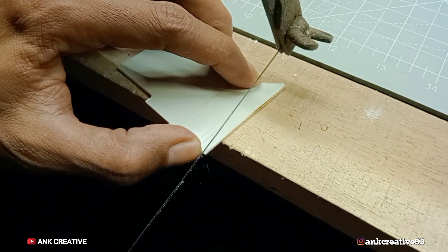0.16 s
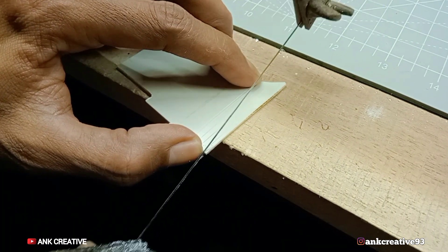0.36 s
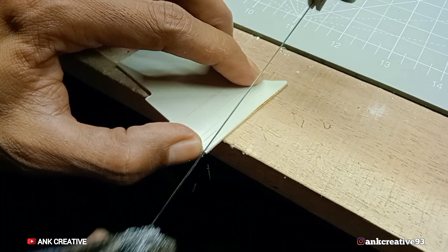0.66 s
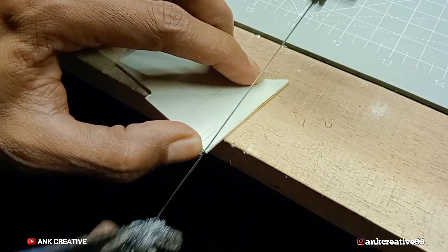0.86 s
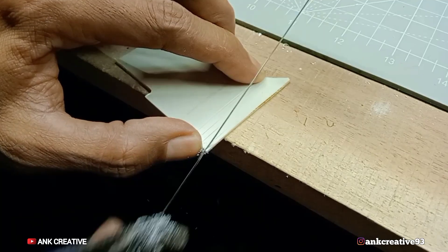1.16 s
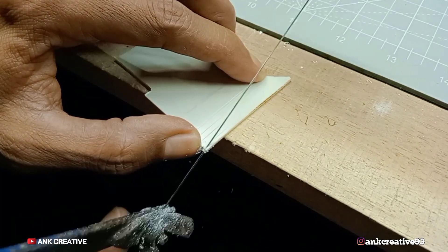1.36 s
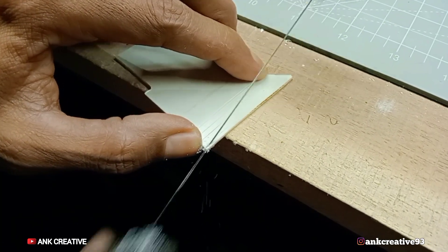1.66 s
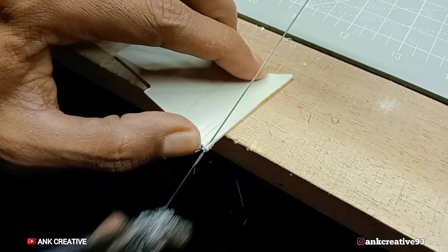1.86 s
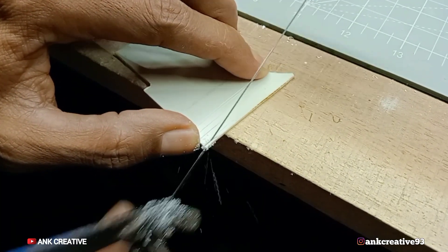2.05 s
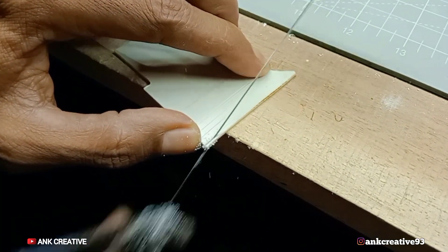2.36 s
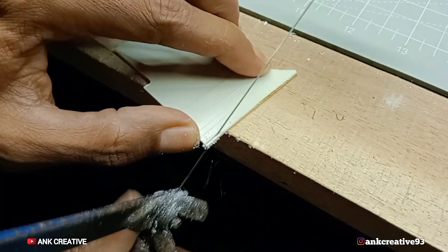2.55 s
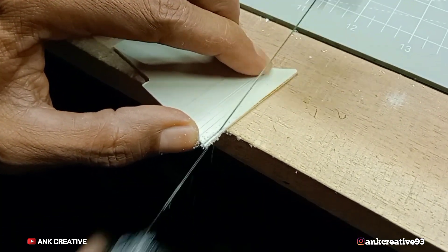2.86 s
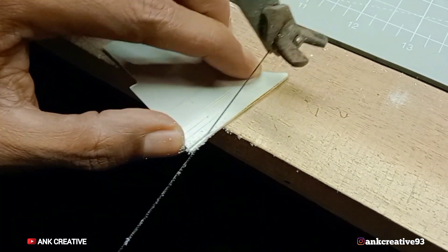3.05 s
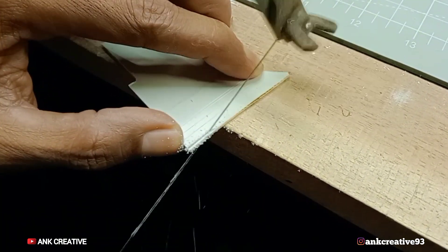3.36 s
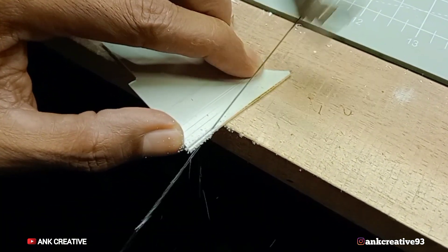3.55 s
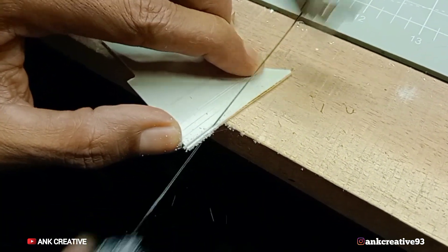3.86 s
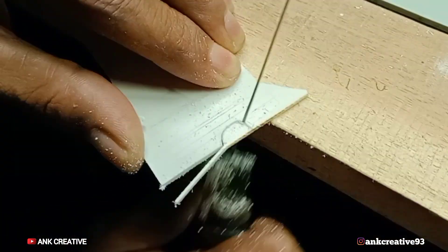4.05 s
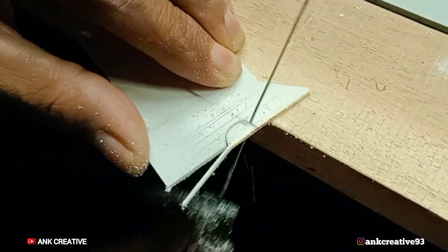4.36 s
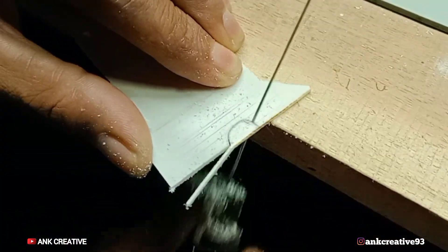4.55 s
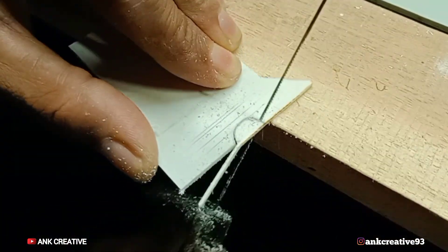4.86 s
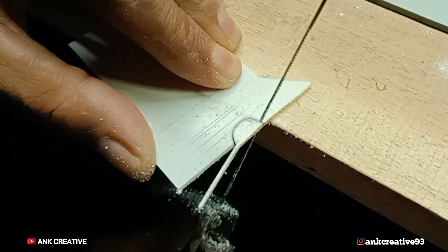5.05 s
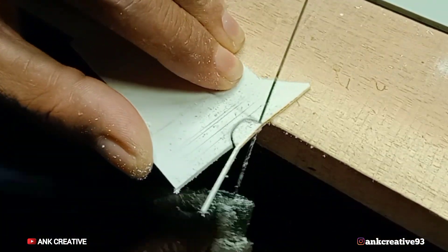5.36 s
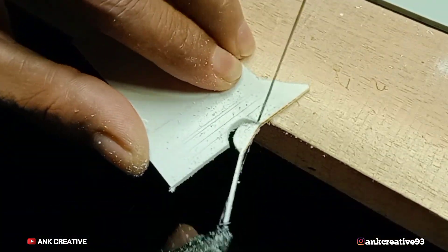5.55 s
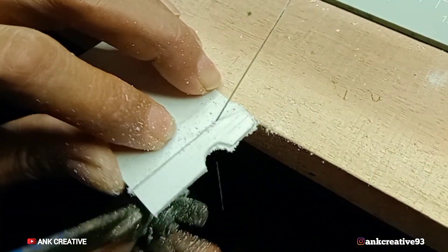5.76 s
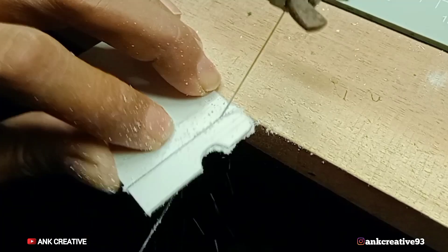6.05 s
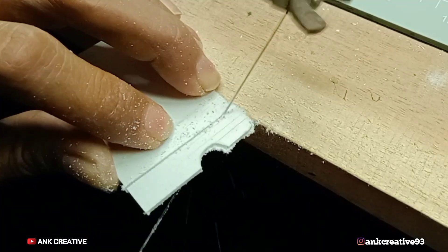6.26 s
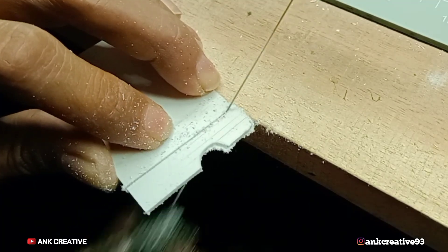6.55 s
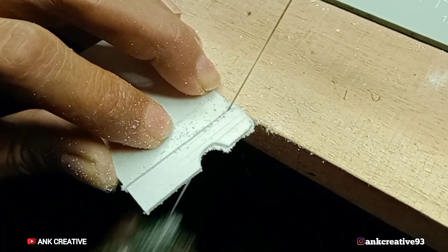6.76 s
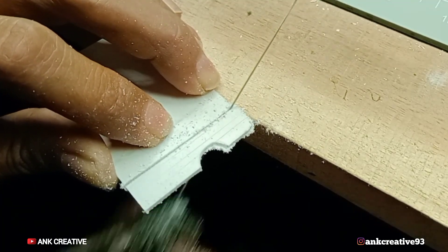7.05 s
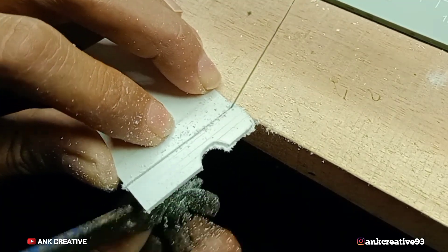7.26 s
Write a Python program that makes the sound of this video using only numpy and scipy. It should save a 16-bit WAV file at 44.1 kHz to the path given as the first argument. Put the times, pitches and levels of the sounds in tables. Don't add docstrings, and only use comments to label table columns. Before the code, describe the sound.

A fretsaw cuts thin plastic in quick rasping back-and-forth strokes on a wooden bench, with small snaps, low thumps and faint crickets behind.

```python
import sys
import numpy as np
from scipy import signal
from scipy.fft import rfft, irfft
from scipy.io import wavfile
from scipy.ndimage import uniform_filter1d, map_coordinates

SR = 44100
rng = np.random.default_rng(int(sys.argv[2]) if len(sys.argv) > 2 else 0)


def file_out(sig):
    cols = np.atleast_2d(sig).T
    lim = np.clip(cols, -1, 1)
    pcm = np.round(lim * 32767).astype(np.int16)
    wavfile.write(sys.argv[1], SR, pcm)


def makeup_ratio(level_db):
    decades = np.asarray(level_db, float) / 20
    return 10 ** decades


N = 326340
TIME_S = np.arange(N) / SR
CATCH_HISS_DB = -34

REGRIP_S = [
    4.205,
    5.59,
]
# start_s, length_s, rasp_db, bench_weight_db (over rasp)
CUTS = [(0.391, 0.098, -47, 17), (0.661, 0.097, -42.5, 17), (0.903, 0.11, -44, 18),
        (1.155, 0.11, -41.5, 14.5), (1.402, 0.097, -38, 11.5), (1.639, 0.1, -36.5, 10),
        (1.881, 0.081, -34.5, 11), (2.106, 0.098, -35.5, 13.5), (2.36, 0.092, -33.5, 11.5),
        (2.59, 0.095, -32.5, 10.5), (2.831, 0.099, -34, 10.5), (3.244, .1, -34, 10), (3.496, 0.087, -32, 7),
        (3.739, 0.082, -31, 9.5), (3.965, 0.1, -33.5, 11), (4.32, 0.091, -30.5, 14.5),
        (4.557, 0.083, -33, 17), (4.785, 0.081, -26, 12.5), (4.988, 0.077, -33.5, 17),
        (5.194, 0.094, -32, 13), (5.468, 0.069, -40.5, 11), (5.792, 0.075, -31.5, 5.5),
        (5.991, 0.084, -30, 8.5), (6.205, 0.077, -28.5, 3.5), (6.425, 0.076, -29, 5),
        (6.637, 0.07, -29.5, 3), (6.861, 0.063, -31.5, 3), (7.064, 0.092, -37, 3)]
# start_s, length_s, rasp_db, bench_weight_db (over rasp)
RETURNS = [(0.23, 0.099, -51.5, 12.5), (0.515, 0.11, -47, 10), (0.786, 0.097, -43.5, 10),
           (1.042, 0.092, -40.5, 4.5), (1.279, 0.1, -44.5, 10.5), (1.509, 0.11, -44, 6),
           (1.747, .11, -41, 4), (1.982, .11, -41.5, 2.5), (2.228, 0.099, -42.5, 7.5), (2.468, 0.1, -41, 8),
           (2.708, 0.098, -39.5, 5), (3.118, 0.108, -44, -7), (3.366, 0.1, -40.5, 8), (3.598, .11, -42, 10),
           (3.84, 0.1, -40.5, 2), (4.084, 0.098, -46, 5), (4.454, 0.078, -45.5, 25),
           (4.689, 0.053, -46.5, 27), (4.892, 0.077, -44, 24), (5.118, 0.057, -38, 14.5),
           (5.312, 0.073, -49.5, 5), (5.888, 0.078, -42.5, 10), (6.097, 0.085, -45, 9),
           (6.314, 0.08, -41, 10), (6.528, 0.076, -42, 11), (6.745, 0.087, -44.5, 10),
           (6.963, 0.085, -50.5, 14.5), (7.186, 0.091, -48, -4)]
# centre_hz, width_hz, level_db
SHEET = [
    [(967, 80, 0), (1404, 98, -2), (1920, 226, -6.5), (2200, 75, -3), (2740, 140, 1.5), (3022, 153, 0),
     (3460, 83, -4.5), (4217, 146, -3.5), (4520, 150, -11)],
    [(953, 163, 4.5), (1348, 71, -5), (1830, 720, -4), (2750, 77, -2), (3066, 91, 0.5), (3920, 43, -25),
     (4206, 46, -26), (4300, 43, -6.5)],
    [(938, 133, 1.5), (1404, 76, -5), (1892, 250, -4), (2200, 240, 1), (2490, 70, -21), (2706, 78, 2),
     (3340, 470, -6.5), (3500, 160, -8), (4330, 430, -14)],
]
# centre_hz, width_hz, level_db
BENCH = [
    [(94, 25, -11), (158, 25, -1.5), (300, 20, -4), (500, 112, -6), (678, 56, -12)],
    [(155, 47, 0.5), (224, 14, 2), (283, 49, -3), (472, 157, -4), (694, 33, -14)],
    [(121, 24, -1), (187, 11, -19), (300, 41, -3), (520, 130, -9), (677, 150, -11)],
]
# centre_hz, width_hz, level_db
BLADE = [
    [(7300, 130, -2), (9370, 1100, -5), (10730, 660, -21)],
    [(7370, 270, 6.5), (8200, 840, 3.5), (9800, 510, 11)],
    [(6900, 990, -3.5), (9160, 1100, 2), (10200, 500, -2)],
]
# freq_hz, level_db
SCRAPE = [(25, -74), (700, -13), (1200, -2), (1600, -28.5), (2500, -5.5), (3800, -10), (4800, -22.5),
          (5500, -46), (16000, -106)]
# freq_hz, level_db
BOOM = [(20, -84), (70, -23.5), (120, -4.5), (300, -5), (650, -19), (800, -25.5), (1500, -45),
        (16000, -100)]
# freq_hz, level_db
FIZZ = [(2000, -61), (5000, -6), (6200, -14.5), (7500, -10.5), (10000, -13), (11500, -16.5), (13000, -15),
        (15600, -55)]


def unit(x):
    return x / np.sqrt(np.mean(x ** 2) + 1e-20)


def along(points, hz):
    f, v = np.transpose(points)
    return np.interp(np.log(hz + 1), np.log(f + 1), v)


def wobble(rate):
    return map_coordinates(rng.standard_normal(int(N * rate / SR) + 4), [np.arange(N) * rate / SR])


def grip_at(s):
    return np.searchsorted(REGRIP_S, s)


def body(x, modes, between):
    size = 8192
    hz = np.fft.rfftfreq(size, 1 / SR)
    power = makeup_ratio(2 * along(between, hz))
    for centre_hz, width_hz, db in modes:
        power = power + makeup_ratio(2 * db) / (1 + ((hz - centre_hz) / (0.59 * width_hz)) ** 2) ** 2
    cepstrum = irfft(np.log(power) / 2)
    cepstrum[1:size // 2] *= 2
    cepstrum[size // 2 + 1:] = 0
    response = irfft(np.exp(rfft(cepstrum)))
    return signal.fftconvolve(x, response / np.linalg.norm(response))[:N]


def gripped(x, bodies, between):
    edges = [0, *(round(s * SR) for s in REGRIP_S), N]
    out = np.zeros(N)
    for start, end, modes in zip(edges, edges[1:], bodies):
        answer = body(x[start:end], modes, between)[:N - start]
        out[start:start + len(answer)] += answer
    return out


def saw():
    # centre_hz, width_hz, level_db
    board_modes = [
        (516, 510, -48),
        (500, 130, -54),
        (520, 136, -38.5),
    ]
    # freq_hz, level_db
    kerf = [(600, -29.5), (1300, 4.5), (3000, 2.5), (4700, -18), (5400, -22), (9000, -49)]

    rasp, bench, hiss = strokes(bite=0.013, edge_db=7.0)
    force = unit(tooth_beat(rasp) * teeth(rate=2500, spread_db=2.5, rub=1.0, clump_db=3.5))
    fine = 0.55 * force + teeth(rate=3800, spread_db=3.5, rub=1.36, clump_db=1.5)
    push = 0.5 * force + teeth(rate=400, spread_db=0.5, rub=1.0, clump_db=1)

    sheet = gripped(makeup_ratio(3.5) * rasp * roaming(force, depth_db=1.0), SHEET, SCRAPE)
    sheet += makeup_ratio(-5.5) * rasp * squeaks(rate=260, cycles=6.3, spread_db=12.0)
    flanks = body(makeup_ratio(-48.0) * unit(rasp) ** 0.74 * fine, [], kerf)
    boom = gripped(makeup_ratio(-6.0) * bench * roaming(push, depth_db=0.0), BENCH, BOOM)

    board_gain = makeup_ratio(np.array(board_modes)[grip_at(TIME_S), 2])
    drone = uniform_filter1d(unit(rasp) ** 0.38, 900) * board_gain
    single_modes = [[(hz, width_hz, 0)] for hz, width_hz, _ in board_modes]
    board = gripped(drone * push, single_modes, [(300, -5.0), (1500, -42), (5000, -86)])

    cut_edges_s = [e for s, length, *_ in CUTS for e in (s - .01, s + length + .01)]
    cutting = np.searchsorted(cut_edges_s, TIME_S) % 2
    treble = blade(hiss, fine, cutting) + chips(hiss, cutting)
    return sheet + flanks + boom + board + overtones(treble, depth_db=3.0) + table(bench)


def strokes(bite, edge_db):
    # start_s, length_s, rasp_db, bench_weight_db (over rasp)
    feelers = [
        (0.062, 0.021, -64, 24.5),
        (0.1, 0.062, -60.5, 16),
        (4.222, 0.093, -34.5, 10),
        (5.624, 0.052, -45.5, 5),
        (5.718, 0.026, -38, -12),
        (7.291, 0.081, -48.5, -11),
    ]
    peak_place = [
        [0.61, 0.67, 0.56],
        [0.72, 0.24, 0.81],
        [.3, .85, 0.43],
    ]
    hiss_level_db = [
        [-20, -19.5, -20],
        [-23, -22.5, -21.5],
        [-28, -29, -20],
    ]
    pointed_db = [
        [6.4, 8.5, 12],
        [5.7, 6.9, 10.8],
        [12, 18, 6.5],
    ]
    dig_in = [
        [14, 12, 6],
        [16, 40, 11],
        [30, 6, 30],
    ]
    creep_in_db = [-14.5, -17.5, -23]
    shivers_db = [
        np.zeros(len(CUTS)),
        [-1, -0.5, 0.5, 1, 3, 3, 3, 1.5, 1, -0.5, -1.5, 2.5, -1.5, 0, 1.5, -1, -5, 3.5, -2, -9, 5.5, 4, 1, -2.5, -6, -4, 1, -4],
        [0, 0, -0.064, -0.57, -1.3, 1.1],
    ]
    hiss_lag = 0.22
    let_go = 9

    power = np.zeros((3, N))
    for kind, rows in enumerate([CUTS, RETURNS, feelers]):
        for (start, length, rasp_db, bench_db), shiver_db in zip(rows, shivers_db[kind]):
            grip = grip_at(start)
            near = slice(max(round((start - .06) * SR), 0), round((start + length + 0.12) * SR))
            peak = np.clip(peak_place[kind][grip], .12, .88)
            hiss_db = hiss_level_db[kind][grip] + shiver_db - hiss_lag * (rasp_db + 35.5)
            u = (TIME_S[near] - start) / length - peak
            steep = np.where(u < 0, dig_in[kind][grip], let_go)
            u = np.where(u < 0, -u / peak, u / (1 - peak))
            arch_db = max(pointed_db[kind][grip] + bite * (rasp_db + 36.0), 1)
            shape_db = -arch_db * np.array([[1], [.9], [.5]]) * u ** 0.98 - edge_db * u ** steep
            creep_db = np.where(steep == let_go, -12, creep_in_db[grip]) - 11 * u
            shape_db = np.maximum(shape_db, creep_db)
            power[:, near] += makeup_ratio(2 * (rasp_db + np.array([[0], [bench_db], [hiss_db]]) + shape_db))
    return np.sqrt(power)


def teeth(rate, spread_db, rub, clump_db):
    size = np.minimum(rng.exponential(size=N), 3.5)
    slips = (rng.random(N) < rate / SR) * makeup_ratio(spread_db * size) * rng.choice([-1, 1], N)
    rubbed = unit(slips) + rub * rng.standard_normal(N)
    return unit(rubbed * makeup_ratio(clump_db * wobble(140)))


def tooth_beat(rasp):
    tooth_hz, sway = 190, .25
    full_depth, full_bite_db = .7, -35
    turn = np.cumsum(tooth_hz * np.exp(sway * wobble(45)) / SR)
    size = rng.uniform(0.36, 1.51, int(turn[-1]) + 1)[turn.astype(int)]
    depth = full_depth * np.clip(rasp / makeup_ratio(full_bite_db), 0, 1) ** .7
    kicks = uniform_filter1d(size * np.exp(-3 * (turn % 1)), size=24)
    return 1 - depth + depth * 2.46 * kicks


def roaming(x, depth_db):
    z = signal.stft(x, nperseg=256)[2]
    field = uniform_filter1d(rng.standard_normal(z.shape), size=4, axis=0)
    field = uniform_filter1d(field, size=14, axis=1)
    return signal.istft(z * makeup_ratio(depth_db * unit(field)), nperseg=256)[1][:N]


def squeaks(rate, cycles, spread_db):
    count, span = int(rate * N / SR), np.arange(700)
    at, pick, size, detune = rng.random((count, 4)).T
    grips = grip_at(at * N / SR)
    mode_hz = [SHEET[g][1 + int(p * (len(SHEET[g]) - 1))][0] for g, p in zip(grips, pick)]
    hz = np.array(mode_hz) * (.96 + 0.091 * detune)
    turns = hz[:, None] * span / SR
    swell = turns / cycles * np.exp(-turns / cycles) * makeup_ratio(spread_db * size)[:, None]
    where = (at * N).astype(int)[:, None] + span
    tones = swell * np.sin(2 * np.pi * turns)
    return unit(np.bincount(where.ravel(), tones.ravel(), N + 700)[:N])


def blade(hiss, fine, cutting):
    # centre_hz, width_hz, level_db
    blade_back = [
        [(8060, 400, -5), (9600, 390, -0.5), (10200, 500, -18)],
        [(7420, 400, 0), (9340, 550, 9), (10000, 560, 2)],
        [(7200, 500, -11), (8900, 980, 0.5), (10060, 930, -3)],
    ]
    shiver = makeup_ratio(1.5) * hiss * roaming(fine, depth_db=3.0)
    return gripped(shiver * cutting, BLADE, FIZZ) + gripped(shiver * (1 - cutting), blade_back, FIZZ)


def chips(hiss, cutting):
    # centre_hz, width_hz, level_db
    rattle = [
        [(14600, 900, 1), (10650, 1500, 5.5), (12900, 700, -2)],
        [(14600, 1500, -8), (11700, 540, 2)],
        [(13000, 2000, 4), (14900, 900, -4)],
    ]
    # freq_hz, level_db
    dust = [(9000, -40), (11800, -6), (13800, -7), (15300, -3.5)]
    start_db = [4, -17, -10]
    slope_db_per_s = [-1.85, 6, 6]
    cut_db = -0.5
    grip = grip_at(TIME_S)
    held_s = TIME_S - np.array([0, *REGRIP_S])[grip]
    level_db = np.take(start_db, grip) + np.take(slope_db_per_s, grip) * held_s + cut_db * cutting
    spray = roaming(teeth(rate=1500, spread_db=5, rub=0.92, clump_db=0.5), depth_db=1.5)
    return gripped(makeup_ratio(level_db) * hiss * unit(hiss) ** 0.24 * spray, rattle, dust)


def overtones(x, depth_db):
    z = signal.stft(x, nperseg=512)[2]
    field = uniform_filter1d(rng.standard_normal(z.shape), size=16, axis=1)
    gain_db = depth_db * unit(field) - .115 * depth_db ** 2
    return signal.istft(z * makeup_ratio(gain_db), nperseg=512)[1][:N]


def catches():
    # time_s, peak_db, ring_hz, hiss_db (over peak)
    hard_catches = [(.724, -25, 2200, -34), (1.2084, -21.5, 2930, -23), (1.231, -21, 2870, -28),
                    (1.4677, -25.5, 3490, -16.5), (1.6835, -19, 3260, -25), (1.935, -19, 3610, -22),
                    (2.1726, -21.5, 3650, -21.5), (2.4006, -22, 3170, -48), (2.639, -16.5, 4270, -27),
                    (2.663, -21, 2720, -38), (2.8869, -15.5, 3360, -24), (3.3024, -22.5, 4210, -21),
                    (3.3306, -20, 1970, -38), (3.558, -19, 3210, -25), (3.7686, -18.5, 3330, -24),
                    (4.0097, -19, 3530, -21), (4.0266, -15.5, 3340, -24), (4.329, -21.5, 1900, -17),
                    (4.5908, -20, 1820, -21), (4.604, -15.5, 1830, -34), (4.7884, -19.5, 1820, -43),
                    (4.834, -9.5, 1820, -38), (5.02, -26.5, 1800, -28), (5.0403, -18.5, 1810, -48),
                    (5.8168, -17, 2740, -19.5), (6.0354, -19, 3860, -17.5), (6.2499, -11, 3310, -23),
                    (6.448, -18.5, 3480, -21.5), (6.6766, -18.5, 2200, -20), (6.9025, -20, 2200, -45)]
    # time_s, peak_db, ring_hz
    snags = [(2.5465, -20, 1920), (3.152, -29, 2720), (3.169, -29, 3030), (3.438, -20, 2720),
             (3.9129, -23, 3200), (3.9705, -22, 1780), (4.148, -23.5, 2050), (4.458, -35, 2630),
             (4.476, -28, 2120), (4.2889, -18, 2190), (4.4883, -19.5, 2190), (4.6927, -32, 930),
             (4.983, -33, 1830), (3.9053, -25, 2750), (4.913, -19, 2920), (4.9502, -19, 1840),
             (5.117, -27, 2710), (5.274, -21, 1830), (5.6276, -32.5, 3000), (5.718, -21.5, 2130),
             (5.724, -37, 3700), (5.727, -19.5, 3020), (5.85, -16, 2800), (5.931, -23.5, 2140),
             (6.145, -21.5, 1930), (6.8856, -15.5, 2380), (6.8858, -18.5, 3590), (6.9028, -14, 3400),
             (6.677, -19.5, 3490), (4.01, -19, 2700), (7.1158, -21, 1970)]
    # time_s, peak_db, ring_hz
    ticks = [(0.8066, -22, 2770), (1.532, -23.5, 3030), (1.8176, -20.5, 3000), (2.253, -25, 2750),
             (2.387, -22, 2730), (2.601, -20, 2980), (2.614, -15, 4080), (2.6297, -14.5, 2740),
             (2.717, -19.5, 3270), (3.501, -29, 1920), (3.51, -14.5, 2680), (3.541, -17, 2660),
             (3.6282, -31, 2760), (3.7384, -32, 2900), (3.9944, -13.5, 3460), (4.2668, -25, 2120),
             (4.2468, -28, 1970), (4.343, -9.5, 1960), (4.3578, -13, 2240), (4.3755, -13, 1920),
             (4.5801, -21, 1790), (4.805, -10, 1780), (5.1288, -26, 2690), (5.2337, -22, 2700),
             (6.009, -23, 2730), (6.0261, -17, 2650), (6.2183, -22.5, 2250), (6.4283, -28, 2700),
             (6.0004, -21, 2670), (6.86, -27, 1920), (6.8794, -17, 2250)]
    ring_db = [
        6.5,
        6,
        -4,
        -1.5,
    ]
    jolt_db = [
        -7,
        -0.5,
        -13,
        -5,
    ]
    ring_t60_s = [
        .019,
        .009,
        .012,
        .012,
    ]
    tick_hiss_db = -36
    snap_db, snap_t60_s = 3.5, 0.00039
    ring_top_hz = 4900

    kinds = [hard_catches, [(*row, CATCH_HISS_DB) for row in snags],
             small_catches(), [(*row, tick_hiss_db) for row in ticks]]
    ring, jolts = np.zeros(N + SR), np.zeros((3, N + SR))
    t = np.arange(SR // 20) / SR
    rise = 1 - np.exp(-t / 0.0009)
    snap = [[1], [1], [.2]] * makeup_ratio(snap_db - 60 * t / snap_t60_s)
    jolt_t60_s = np.array([[.013], [.045], [.016]])
    for kind, rows in enumerate(kinds):
        for s, db, hz, hiss_db in rows:
            at = round(s * SR)
            chance = rng.standard_normal((4, len(t)))
            drift = 0.052 * np.cumsum(chance[0])
            other_hz = rng.choice(SHEET[grip_at(s)])[0]
            pair = np.sin(2 * np.pi * hz * t + drift) + 0.37 * np.sin(2 * np.pi * other_hz * t - drift)
            ring[at:][:len(t)] += makeup_ratio(db + ring_db[kind] - 60 * t / ring_t60_s[kind]) * rise * pair
            levels_db = db + np.array([[jolt_db[kind]], [-9], [hiss_db + 9.5]])
            jolts[:, at:at + len(t)] += makeup_ratio(levels_db - 60 * t / jolt_t60_s) * (rise + snap) * chance[1:]
    sheet, bench, blade_jolt = jolts[:, :N]
    lowpass = signal.butter(4, ring_top_hz, fs=SR, output="sos")
    plastic = signal.sosfilt(lowpass, ring[:N] + gripped(sheet, SHEET, SCRAPE))
    return plastic + gripped(bench, BENCH, BOOM) + gripped(blade_jolt, BLADE, FIZZ)


def small_catches():
    over_rasp_db, spread_db = 14.5, 1
    strokes_twice = np.repeat(CUTS + RETURNS, 2, axis=0)
    out = []
    for s, length, rasp_db, _ in strokes_twice:
        place, size, pick = rng.random(3)
        peak_db = rasp_db + over_rasp_db + spread_db * (4 * size - 2)
        ring_hz = SHEET[grip_at(s)][2 + int(3 * pick)][0]
        out.append((s + length * (.15 + .7 * place), peak_db, ring_hz, CATCH_HISS_DB))
    return out


def dwells():
    # middle_s, length_s, level_db, mode_hz
    thumps = [(0.125, 0.045, -42, 172), (0.3, 0.099, -35, 158), (0.279, 0.039, -26.5, 79),
              (0.712, 0.041, -28.5, 292), (0.713, 0.052, -29, 161), (0.967, 0.026, -25, 244),
              (1.21, 0.048, -27, 264), (1.459, 0.048, -26, 70.5), (1.468, 0.038, -28.5, 283),
              (1.699, 0.034, -23, 297), (1.932, 0.048, -26.5, 304), (1.933, 0.029, -30.5, 75),
              (2.142, 0.037, -33, 292), (2.171, 0.041, -28, 81), (2.404, 0.082, -28, 314),
              (2.895, 0.031, -23, 85), (3.516, 0.055, -25.5, 303), (3.55, 0.052, -31, 513),
              (4.013, 0.037, -37, 296), (4.039, 0.025, -23, 99), (4.343, 0.038, -17, 171),
              (4.343, 0.054, -25, 531), (4.358, 0.044, -19, 239), (4.364, 0.032, -22, 81),
              (4.607, 0.046, -25, 412), (4.609, 0.042, -29, 473), (4.609, 0.084, -25, 74),
              (4.62, 0.032, -25.9, 344), (4.627, 0.051, -16.5, 157), (4.816, 0.037, -25, 155),
              (4.838, 0.062, -15, 285), (4.846, 0.046, -19, 482), (5.028, 0.019, -20.5, 417),
              (5.032, 0.033, -29, 251), (5.043, 0.05, -13.5, 146), (5.233, 0.023, -17, 126),
              (5.261, 0.069, -36, 516), (5.502, 0.041, -29, 307), (5.832, 0.034, -25, 352),
              (5.835, 0.041, -29.5, 650), (6.015, 0.024, -39, 300), (6.254, 0.055, -25.5, 294),
              (6.267, 0.1, -26, 76), (6.292, 0.039, -33, 94), (6.453, 0.036, -22.5, 281),
              (6.519, 0.085, -22.5, 69), (6.674, 0.036, -28, 267), (6.698, 0.054, -22.5, 70),
              (6.89, 0.063, -28, 266), (7.128, 0.078, -29, 80.5)]
    # middle_s, length_s, level_db, mode_hz
    sings = [(0.264, 0.033, -54, 2930), (1.231, 0.026, -30.5, 3080), (2.636, 0.022, -26.5, 3120),
             (2.644, 0.062, -41, 2750), (3.157, 0.018, -32, 2700), (3.167, 0.017, -29.5, 3030),
             (3.191, 0.034, -35, 2950), (3.778, 0.046, -28.5, 3500), (3.782, 0.032, -25, 3025),
             (4.029, 0.061, -32.5, 3310), (4.034, 0.032, -27, 2617), (4.37, 0.053, -29.5, 956),
             (4.604, 0.035, -26.4, 950), (4.819, 0.068, -28.5, 918), (4.832, 0.044, -30, 1355),
             (4.838, 0.012, -16.5, 3045), (5.035, 0.053, -41, 1830), (5.234, 0.013, -31, 2640),
             (5.731, 0.026, -36, 935), (5.727, 0.026, -32, 2280), (5.737, 0.032, -43, 3690),
             (5.836, 0.034, -30, 953), (6.033, 0.034, -28, 2547), (6.035, 0.024, -28, 2880),
             (6.036, 0.034, -27, 2750), (6.25, 0.034, -28.5, 2600), (6.256, 0.028, -33, 930),
             (6.257, 0.046, -34, 2200), (6.453, 0.028, -28, 2546), (6.894, 0.027, -42, 2200),
             (6.897, 0.042, -39, 2720), (7.03, 0.038, -36, 540), (7.12, 0.032, -38, 3500)]
    half = SR // 10
    out, t = np.zeros(N + SR), np.arange(-half, half) / SR
    for rows, trim_db, edge_db, rough in [(thumps, -2, 11.5, 0.0069), (sings, 2, 11, 0.041)]:
        for s, length, db, hz in rows:
            drift = rough * np.cumsum(rng.standard_normal(len(t))) + 2 * np.pi * rng.random()
            swell = makeup_ratio(db + trim_db - edge_db * (2 * t / length) ** 2)
            out[round(s * SR) - half:][:len(t)] += swell * np.sin(2 * np.pi * hz * t + drift)
    return out[:N]


def table(push):
    # time_s, level_db
    arm = [(0, -54), (.45, -37), (.7, -43.5), (2.5, -39.5), (3.3, -40.5), (4.2, -37.5), (4.4, -35),
           (4.7, -34.5), (5.4, -39), (6.1, -39), (7.4, -40.5)]
    # freq_hz, level_db
    rumble = [(15, -29), (35, -9.5), (65, -1), (95, 0.5), (130, -9.5), (300, -71)]
    rock_s, growth = 0.082, 0.86
    s, db = np.transpose(arm)
    swell = np.abs(uniform_filter1d(push, int(rock_s * SR)))
    swell = (swell / (uniform_filter1d(push, SR // 2) + 1e-4)) ** growth
    return makeup_ratio(np.interp(TIME_S, s, db)) * swell * body(rng.standard_normal(N), [], rumble)


def room(x):
    # freq_hz, t60_s
    walls = [(80, 0.42), (500, 0.17), (3000, 0.082), (12000, 0.083)]
    wet, step = np.zeros(N + SR), SR // 4
    for at in range(0, N, step):
        hz, t, z = signal.stft(rng.standard_normal(step), SR, nperseg=256)
        decay = makeup_ratio(-60 * t / along(walls, hz)[:, None])
        tail = signal.istft(z * decay, SR, nperseg=256)[1]
        answer = signal.fftconvolve(x[at:at + step], tail / np.linalg.norm(tail))
        wet[at:at + len(answer)] += answer
    return np.pad(wet, (200, 0))[:N]


def night():
    # freq_hz, level_db (per Hz)
    hum = [(20, -28), (60, -11), (130, -13), (320, -19), (680, -22), (1500, -21), (2200, -17), (3000, -17),
           (4200, -22), (5100, -30), (5500, -44), (9500, -36), (15500, -54)]
    # centre_hz, width_hz, level_db, chirps_per_s, share_sounding (0-1)
    crickets = [
        (4850, 450, -72, 6.06, .55),
        (2200, 160, -79, 4, .8),
    ]
    sound = makeup_ratio(-66 + .8 * wobble(5)) * body(rng.standard_normal(N), [], hum)
    for hz, width_hz, db, rate, share in crickets:
        on = uniform_filter1d(1.0 * ((TIME_S * rate - .03) % 1 < share), 500)
        voice = body(rng.standard_normal(N), [(hz, width_hz, 0)], [(25, -60)])
        sound = sound + makeup_ratio(db + 2.5 * wobble(60)) * on * voice
    return sound


def scene():
    work = saw() + catches() + dwells()
    return (work + makeup_ratio(-11.5) * room(work) + night())[None]


def low_pass(x):
    return signal.sosfilt(signal.butter(12, 15700, fs=SR, output="sos"), x)


def record(dry):
    top_hz = 15600
    soft = dry / (1 + np.abs(dry / .9) ** 4) ** (1 / 4)
    band = irfft(rfft(soft) * (np.fft.rfftfreq(N, 1 / SR) < top_hz), N)
    return low_pass(band)


dry = scene()
out = record(dry)
file_out(out)
```